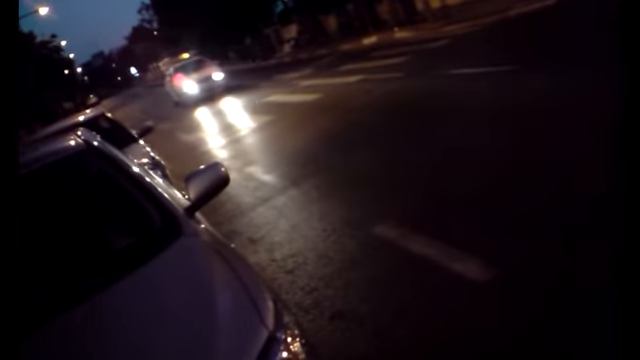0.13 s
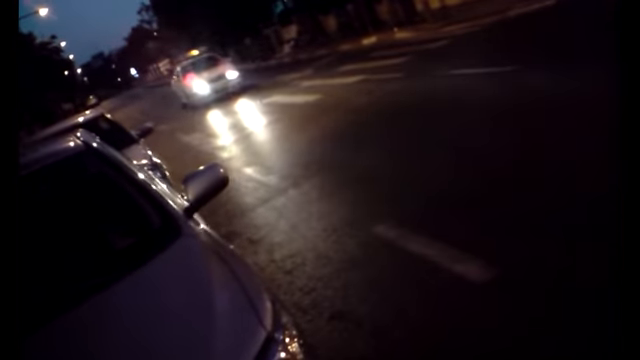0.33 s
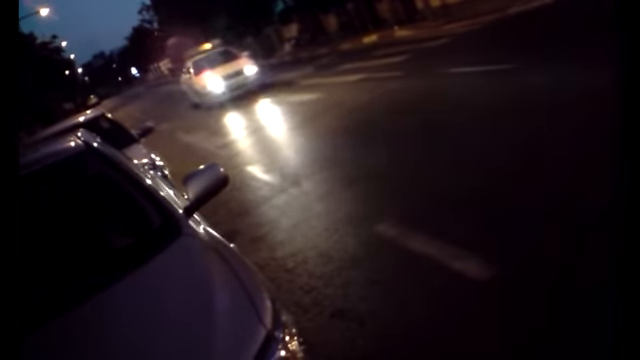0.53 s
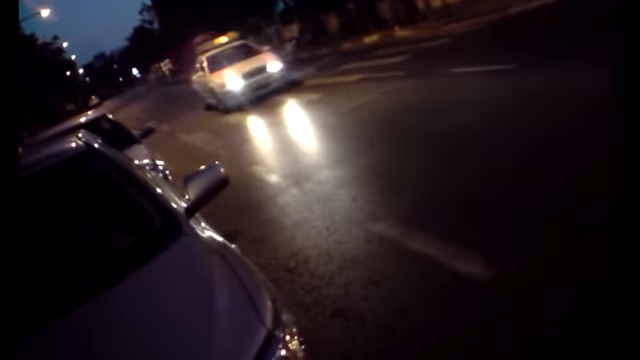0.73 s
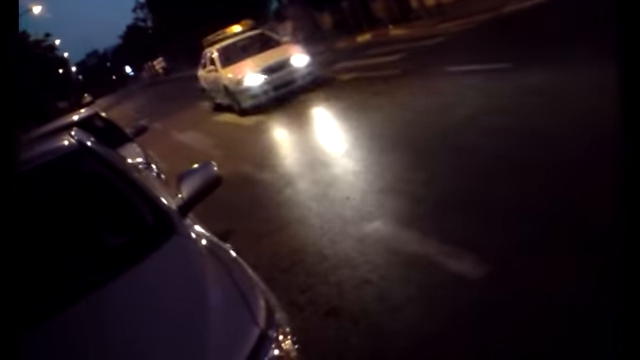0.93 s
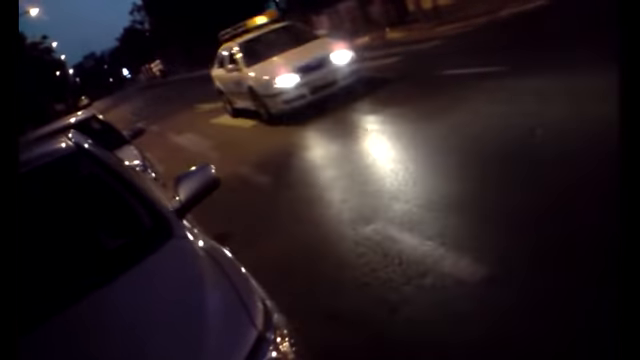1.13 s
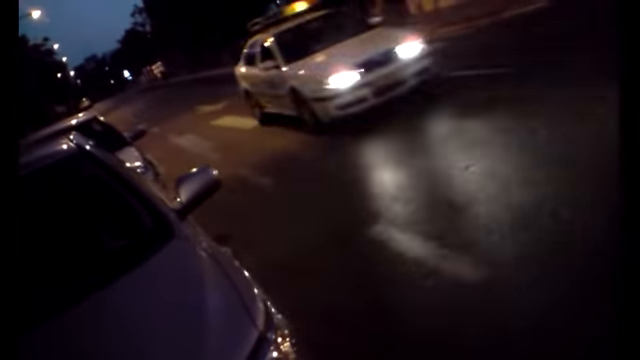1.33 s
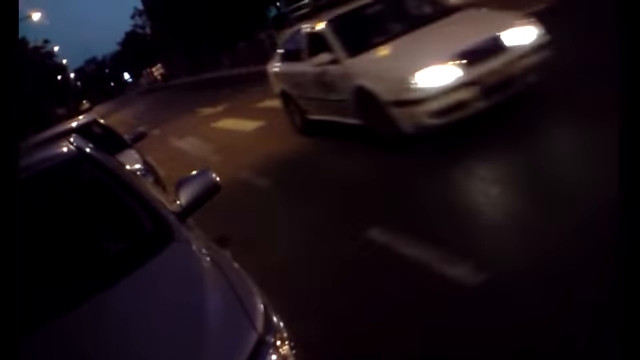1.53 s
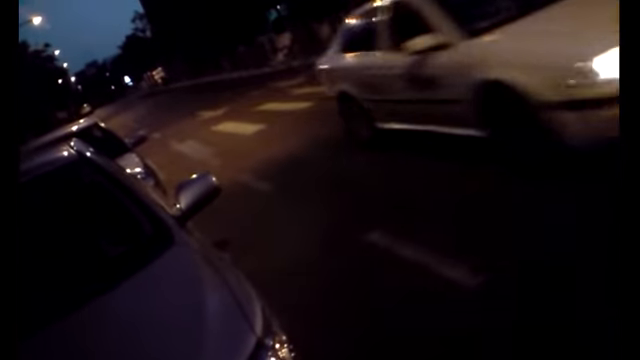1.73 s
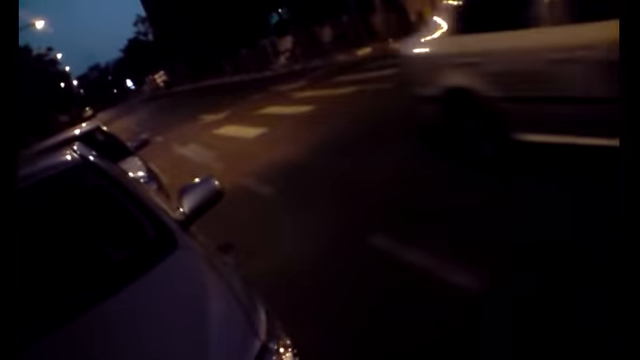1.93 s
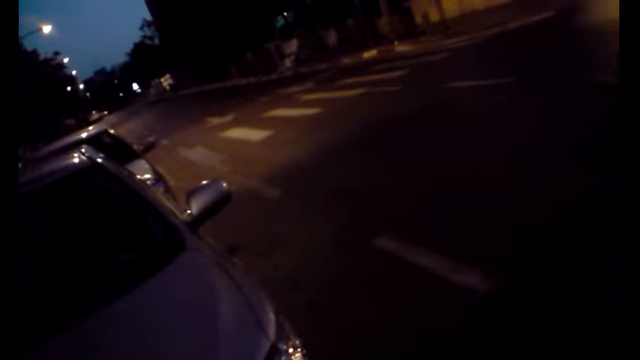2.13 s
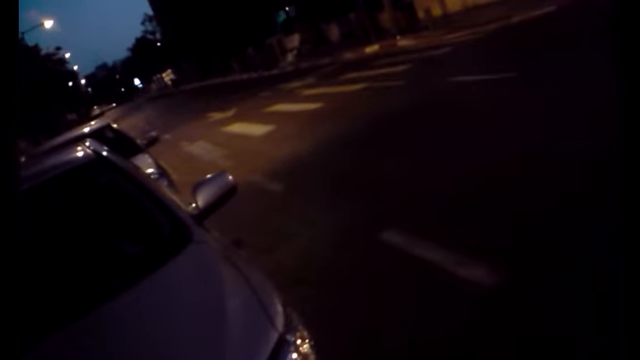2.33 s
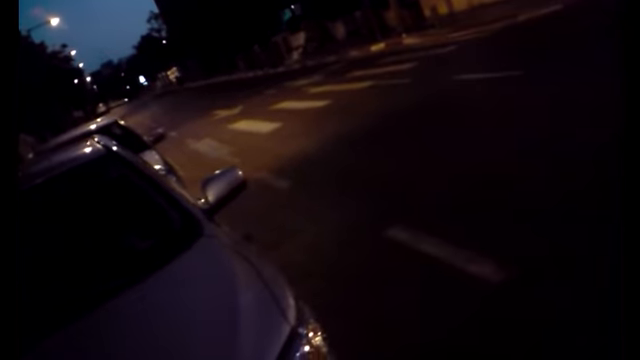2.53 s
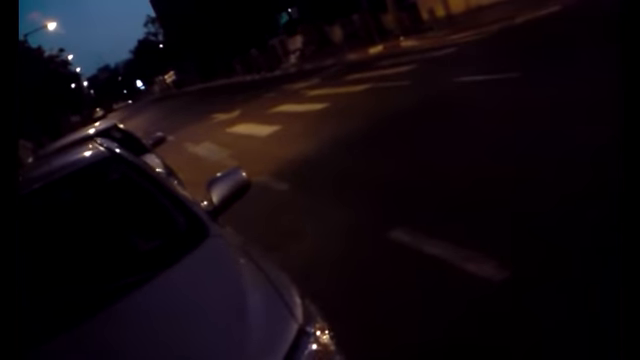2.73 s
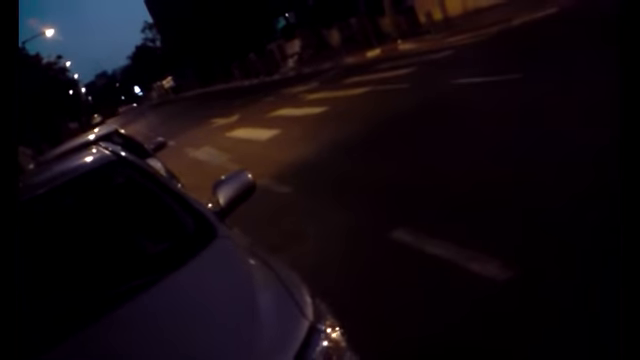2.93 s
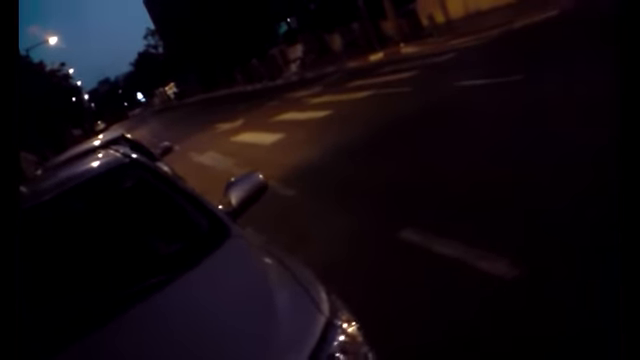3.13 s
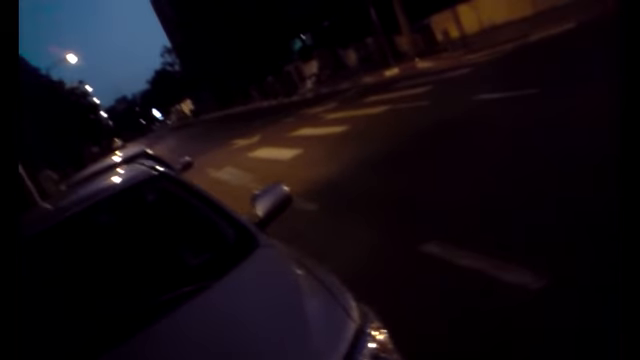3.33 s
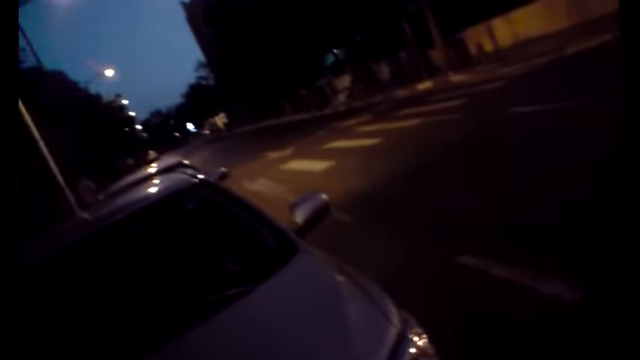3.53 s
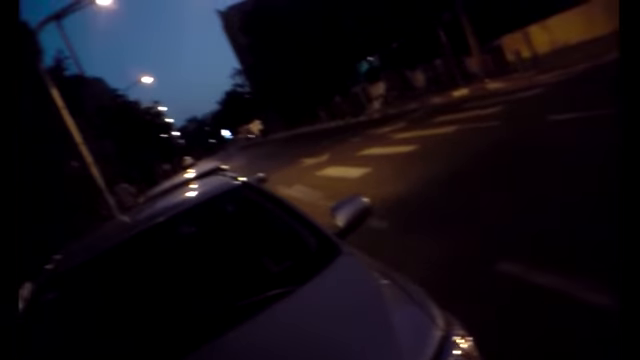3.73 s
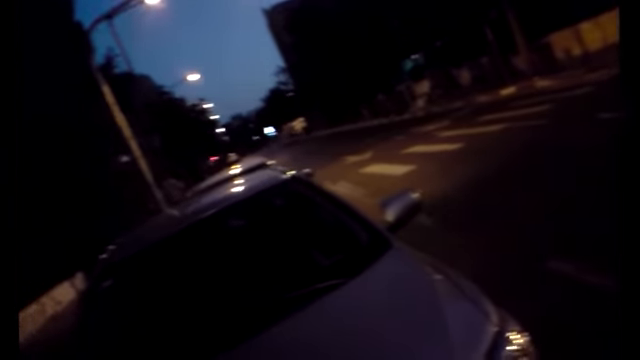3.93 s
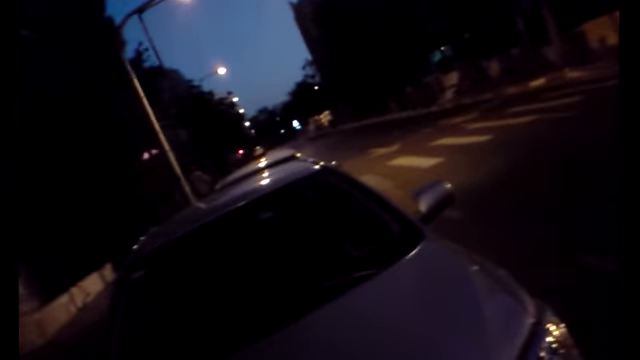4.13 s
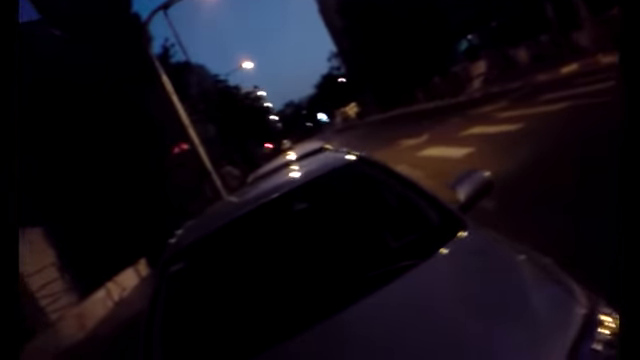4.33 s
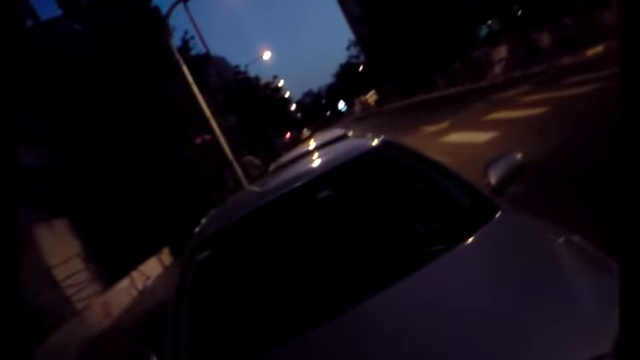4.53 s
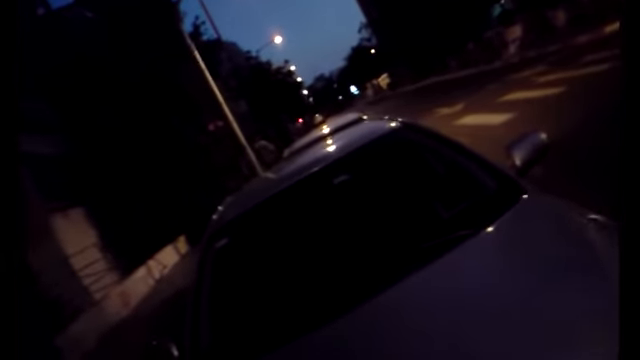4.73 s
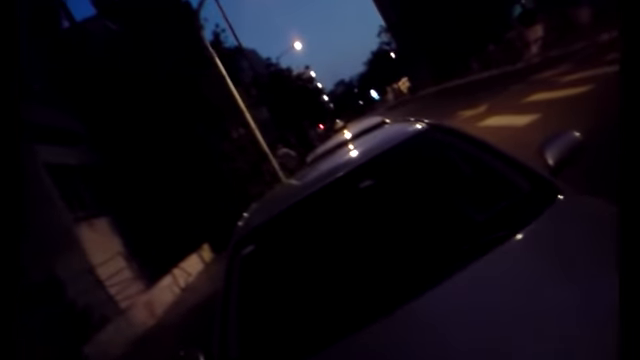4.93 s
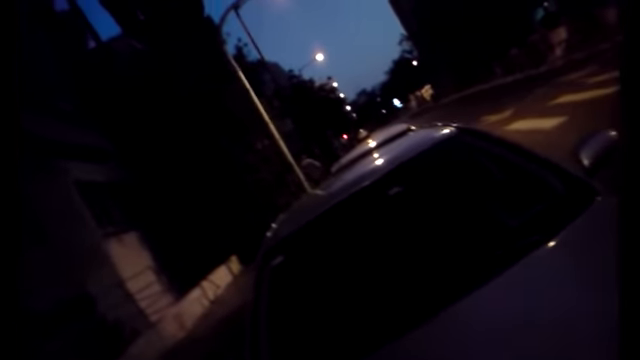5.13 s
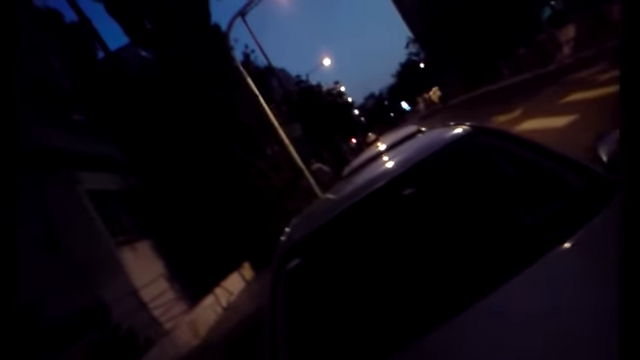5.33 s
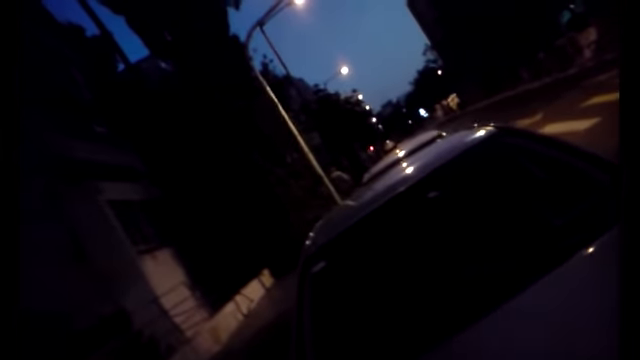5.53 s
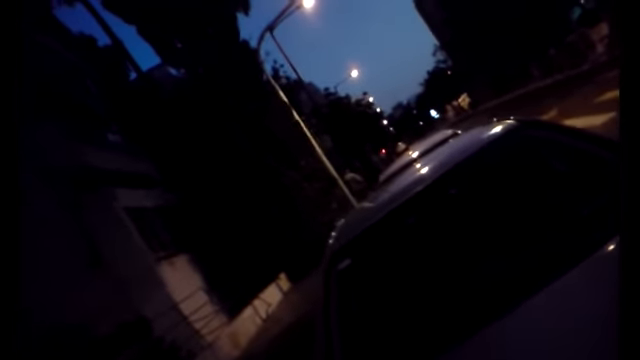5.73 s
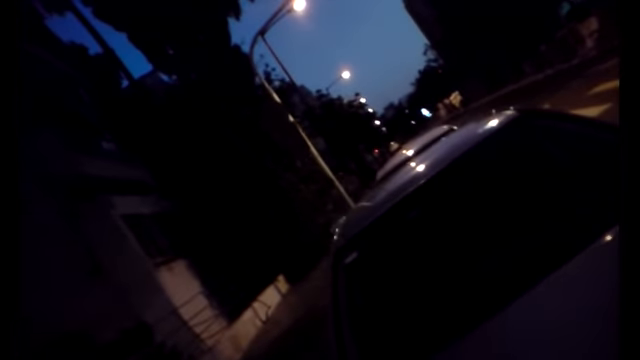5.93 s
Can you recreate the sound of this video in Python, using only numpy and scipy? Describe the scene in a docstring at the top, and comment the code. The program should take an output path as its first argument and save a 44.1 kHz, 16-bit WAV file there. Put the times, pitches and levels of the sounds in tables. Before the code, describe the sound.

Tyres roar and spray on wet asphalt as a car passes close and recedes, leaving faint traffic and one short bird call.

```python
"""A taxi coasts past on a wet street at dawn, closest at about two seconds and slowing as it goes.
Its tyres rumble and roar on the asphalt, throw hissing spray and flick up grit and one stone,
while its four-cylinder engine sinks in pitch. In the quiet that follows a bird calls and the
house fronts answer. Far-off traffic and a faint microphone hiss lie under it all."""
import sys
import numpy as np
from scipy import signal
from scipy.fft import rfft, irfft, next_fast_len
from scipy.io import wavfile
from scipy.ndimage import uniform_filter1d, map_coordinates

SR = 44100
rng = np.random.default_rng(int(sys.argv[2]) if len(sys.argv) > 2 else 0)


def master(y):
    """Save y as 16-bit WAV."""
    cut = np.clip(np.atleast_2d(y).T, -1, 1)
    pcm = np.round(cut * 32767)  # scale
    wavfile.write(sys.argv[1], SR, pcm.astype(np.int16))


N = 268260

AXLES_S = (2.18, 2.334)  # the front and the rear wheels go by
SLOWING_S = 3.33  # from here on the lost speed changes the car's levels
CRUISE_HZ, IDLE_HZ = 85.97, 35.37  # the firing rate at the start, and where it would settle
COAST_S, COAST_POWER = 4.85, 1.8  # time scale of the sinking, and how gently it starts
TREAD_PER_FIRING = 10.8  # tread blocks that meet the road for each firing
TOP_HZ = 11100

# Tone curves of the noise layers and the ticks. Each row: frequency in Hz, relative level in dB.
TRAFFIC_EQ = [(30, -22), (60, -19), (110, -12.5), (145, -9), (200, -7), (350, -6.5), (480, -2), (590, 1.5),
              (690, -2.5), (950, 2.5), (1300, -6), (2500, -31), (6000, -60.5)]
HISS_EQ = [(25, -8), (100, 2.5), (400, 1.5), (2000, 7), (5500, 6), (8000, 6), (10000, -0.5), (11000, -17)]
TICK_EQ = [(150, -32), (600, 1), (5000, -1), (8000, -19)]
MIST_EQ = [(3000, -26), (4400, 7), (5500, 1), (7000, 3), (8000, 3), (8700, -29), (11000, -51)]
RUMBLE_EQ = [(25, -23), (45, -20), (90, -20), (170, -7), (250, 0), (320, 3), (420, 1.5), (500, 3), (590, 5),
             (750, 3), (1300, -33), (4000, -63)]
ROAR_EQ = [(150, -42), (400, -13), (600, -4.5), (780, -5), (1000, -4.5), (1250, 1), (1620, 0), (1950, -4.5),
           (2400, -6), (3100, -16), (4600, -27.5), (5500, -31), (11000, -77)]
SPRAY_EQ = [(500, -18.5), (1100, -26), (1650, 7.5), (2000, 4.5), (2400, 7), (2850, 6.5), (3250, 4.5),
            (4500, 3.5), (5000, -1), (5500, -9.5), (7000, -13), (7900, -22), (8700, -47), (11000, -79)]
PUMPING_EQ = [(300, -79), (500, -35), (660, -7), (760, 0.5), (950, 4), (1090, 3.5), (1250, -1.5),
              (1700, -55), (4000, -120)]

# Pass-by envelopes. Each lists: closest level in dB, seconds until the distance has grown by root 2,
# dB lost per doubling of distance, dB gained ahead and lost behind, dB lost per second of slowing.
THROB_PASS = (-53.5, 0.5, 8, 1, 6)
HUM_PASS = (-57.5, 1, 7, 0.5, 3)
DRONE_PASS = (-47, 0.96, 5.5, 8.5, 0.5)
RUMBLE_PASS = (-38.5, 0.39, 4.5, -0.5, 3)
ROAR_PASS = (-25, 0.3931, 4, 2.5, 3.5)
SPRAY_PASS = (-29.5, 0.1485, 4, 6, 0.4)
TREAD_PASS = (-36, 0.28, 8.5, 0.5, -3.5)
PUMPING_PASS = (-31.5, 0.83, 5.5, 2, 3.5)

# Level rides on the engine. Each row: centre in seconds, half-width in seconds, boost or cut in dB.
THROB_SWELLS = [(0.9, 0.35, -5), (2.4, 0.25, 2), (3.3, 0.09, -12), (3.85, 0.12, 4)]
HUM_SWELLS = [(0.3, 0.15, 2.5), (0.8, 0.22, 5.5), (1.4, 0.18, 6.5), (1.8, 0.17, -16), (2.12, .1, 8),
              (2.42, 0.16, 6), (2.68, 0.088, 7), (2.85, 0.07, 8.5), (3.05, 0.08, -4), (3.27, 0.14, 11.5),
              (3.5, 0.091, -8), (4.07, 0.071, 3), (4.8, 0.21, -8)]
WHINE_SWELLS = [(0.5, 0.2, -6), (1.05, 0.3, 3), (1.62, 0.14, 4), (1.92, 0.12, -4)]
# The tyre roar swells and dips as the car goes by, with the same columns.
ROAR_SWELLS = [(1.94, 0.08, 0.5), (2.12, 0.16, -1.4), (2.68, 0.19, 2.5), (3.0, 0.35, -2.5),
               (3.95, 0.18, 1.9), (4.65, 0.78, -1.5)]
# Deeper water throws more spray, with the same columns.
PUDDLE_SWELLS = [(1.48, 0.39, 1.8), (2.42, 0.12, 1.8), (3.8, 0.29, 1.7)]
# Air pumping peaks just before and after the wheels go by, with the same columns.
PUMPING_SWELLS = [(1.95, 0.21, 5.5), (2.38, 0.2, 6.5), (2.88, 0.11, -0.5)]

# The street's reverb. Each row: frequency in Hz, seconds to die by 60 dB.
STREET_DECAY = [(200, .7), (2500, 0.8), (10000, 0.42)]
# The bird's phrase. Each row: start in seconds, length in seconds, first and last pitch in Hz,
# level in dB, roughness as a share of the pitch.
BIRD_NOTES = [(5.531, 0.017, 2750, 2720, -43, 0.006), (5.551, 0.014, 2710, 2700, -50.5, 0.006),
              (5.772, 0.04, 1795, 1820, -48.5, 0.008), (5.775, 0.045, 2630, 2730, -48, .01),
              (5.807, 0.024, 2935, 3020, -42, .018), (5.83, 0.017, 2624, 2450, -35, 0.057),
              (5.845, 0.028, 2496, 2500, -42, 0.016), (5.881, 0.029, 2510, 2490, -42, 0.013),
              (5.85, 0.066, 2170, 2210, -48, 0.06)]
# Hollow tones. Each row: centre in seconds, half-width in seconds, pitch at the centre in Hz, level in dB.
BOOM_TONES = [(1.72, 0.11, 335.4, -40.5), (2.041, 0.11, 461, -42)]
# The stone's hit lists: start in seconds, attack in seconds, level in dB.
STONE_HIT = (2.205, 0.0022, -14)
# The underbody panel. Each row: pitch in Hz, level against the hit in dB, seconds to die by 60 dB.
PANEL_MODES = [(1190, -3, 0.071), (1815, 3.5, 0.056), (2490, -10, 0.07)]
# Grit and drops. Each row: peak in seconds, pitch in Hz, attack in units of 0.76 ms, pre-EQ level in dB.
GRIT_TICKS = [(0.671, 3630, 0.4, -21), (1.287, 1210, 0.93, -14.5), (1.647, 3580, 0.35, -18),
              (2.084, 3520, 0.37, -18), (2.712, 1040, 0.82, -24), (2.7178, 1790, 0.42, -9),
              (2.95, 1400, 0.65, -21), (3.0104, 1100, 0.7, -21), (5.408, 1050, 0.7, -31)]
# Air ringing in the tread. Each row: centre in seconds, half-width in seconds, pitch in Hz,
# glide in Hz per second, bandwidth in Hz, level in dB.
GROOVE_NOTES = [(0.751, 0.3, 1757, 100, 130, -41), (1.76, 0.24, 1461, 520, 190, -28),
                (1.95, 0.13, 969, 399.5, 190, -30.5), (2.28, 0.12, 793, -250, 95, -32),
                (2.472, 0.045, 1087, 0, 260, -26.5), (3.216, 0.09, 575, 0.5, 50, -41),
                (3.76, 0.15, 680, -60.5, 59, -43.5), (4.678, 0.1, 592, 0.5, 50, -48.5)]
# The engine bay's resonances. Each row: centre in Hz, bandwidth in Hz, gain in dB.
BAY_RESONANCES = [(219, 18.5, 0), (339, 20, -8), (409, 37, -1.5), (590.4, 36, 2.5)]


def amp(db):
    """Decibels to gain."""
    return 10 ** (np.asarray(db) / 20)


def unit(x):
    """x at rms 1."""
    return x / np.sqrt(np.mean(x ** 2) + 1e-20)


def clock():
    """The time of every sample in seconds."""
    return np.arange(N) / SR


def along(points, hz):
    """A curve of (Hz, value) points, read on a log frequency axis."""
    knots_hz, values = np.transpose(points)
    return np.interp(np.log(hz + 1), np.log(knots_hz + 1), values)


def wobble(rate):
    """A smooth random curve, rate knots a second."""
    return map_coordinates(rng.standard_normal(int(N * rate / SR) + 4), [clock() * rate])


def filtered(x, response):
    """x through a gain that depends on frequency."""
    size = next_fast_len(N + SR // 2)
    return irfft(rfft(x, size) * response(np.fft.rfftfreq(size, 1 / SR)), size)[:N]


def equalised(x, curve):
    """x through a tone curve."""
    return filtered(x, lambda hz: amp(along(curve, hz)))


def coloured(x, curve, band):
    """x through a tone curve, brought to rms 1 inside a band."""
    shaped = equalised(x, curve)
    return shaped / np.std(filtered(shaped, lambda hz: (hz > band[0]) & (hz < band[1])))


def patchy(depth_db):
    """White noise with brief patches of random gain."""
    spectra = signal.stft(rng.standard_normal(N), nperseg=1024)[2]
    patches = uniform_filter1d(rng.standard_normal(spectra.shape), size=7, axis=0)
    patches = unit(uniform_filter1d(patches, size=9, axis=1))
    return unit(signal.istft(spectra * amp(depth_db * patches), nperseg=1024)[1][:N])


def blurred_note(hz, width_hz):
    """A narrow band of noise around a steady or gliding pitch."""
    phase = 2 * np.pi * np.cumsum(hz * np.ones(N)) / SR
    slow = lambda: unit(filtered(rng.standard_normal(N), lambda f: 1 / (1 + (2 * f / width_hz) ** 4)))
    return slow() * np.cos(phase) + slow() * np.sin(phase)


def droplets(rate, spread_db):
    """Countless tiny splashes of uneven size."""
    hits = rng.random(N) < rate / SR
    return unit(hits * rng.standard_normal(N) * amp(spread_db * rng.standard_normal(N)))


def bell(centre_s, half_s):
    """A bell-shaped fade in and out."""
    return np.exp(-((clock() - centre_s) / half_s) ** 2)


def swells(rows):
    """A fader ride: one smooth boost or dip for each row."""
    return amp(sum(db * bell(s, half_s) for s, half_s, db in rows))


def passing(envelope, when=AXLES_S):
    """Gain of a sound carried by: it falls with distance, is beamed, and shifts as the car slows."""
    closest_db, near_s, doubling_db, ahead_db, slowing_db_per_s = envelope
    t = clock()
    place = (t - np.reshape(when, (-1, 1))) / near_s
    distance = np.hypot(1, place)
    db = closest_db - doubling_db * np.log2(distance) - ahead_db * place / distance
    slowing = amp(-slowing_db_per_s * np.maximum(t - SLOWING_S, 0))
    return np.sqrt(np.mean(amp(db) ** 2, axis=0)) * slowing


def firing_rate():
    """Coasting in gear, the engine sinks from cruising towards idle."""
    return IDLE_HZ + (CRUISE_HZ - IDLE_HZ) * np.exp(-(clock() / COAST_S) ** COAST_POWER)


def microphone_hiss(db):
    """The microphone's own steady noise floor."""
    return amp(db) * unit(equalised(rng.standard_normal(N), HISS_EQ))


def traffic(db):
    """The faint steady rush of other roads, uncovered as the car recedes."""
    return amp(db) * unit(equalised(rng.standard_normal(N), TRAFFIC_EQ))


def street_echo(x):
    """The house fronts' answer, each frequency dying at its own speed."""
    hz, t, spectra = signal.stft(rng.standard_normal(SR), SR, nperseg=256)
    decay = amp(-60 * t / along(STREET_DECAY, hz)[:, None])
    tail = signal.istft(spectra * decay, SR, nperseg=256)[1]
    return signal.fftconvolve(x, tail / np.linalg.norm(tail))[:N]


def bird():
    """A quick warbled phrase of short whistles, some of them hoarse."""
    t, song = clock(), np.zeros(N)
    flutter = wobble(500)
    for s, length, start_hz, end_hz, db, rough in BIRD_NOTES:
        progress = np.clip((t - s) / length, 0, 1)
        hz = (start_hz + (end_hz - start_hz) * progress) * (1 + rough * flutter)
        envelope = np.sqrt(2 * np.abs(np.sin(np.pi * progress)))
        song += amp(db) * envelope * np.sin(2 * np.pi * np.cumsum(hz) / SR)
    return song


def booms():
    """Brief hollow tones as the body goes by, their pitch sinking with the car's speed."""
    t, speed = clock(), firing_rate()
    tone = lambda s, hz: np.sin(2 * np.pi * np.cumsum(hz * speed / np.interp(s, t, speed)) / SR)
    return sum(np.sqrt(2) * amp(db) * bell(s, half_s) * tone(s, hz) for s, half_s, hz, db in BOOM_TONES)


def stone():
    """A flung stone pings off the underbody, and the panel rings briefly at its modes."""
    s, rise_s, db = STONE_HIT
    age = np.maximum(clock() - s, 0)
    ring = sum(amp(db + mode_db - 60 * age / t60) * np.sin(2 * np.pi * hz * age)
               for hz, mode_db, t60 in PANEL_MODES)
    return ring * (1 - np.exp(-(age / rise_s) ** 2))


def ticks():
    """Each speck of grit or slap of water is a click a few cycles long."""
    t, clicks = clock(), np.zeros(N)
    for s, hz, attack, db in GRIT_TICKS:
        age = np.maximum(1 + (t - s) / (attack * 0.00076), 0)  # 1 at the peak
        clicks += amp(db) * age * np.exp(1 - age) * np.cos(2 * np.pi * hz * (t - s))
    return equalised(clicks, TICK_EQ)


def mist(closest_s, passing_s, db):
    """The finest drops sizzle only while the wheels are near."""
    nearness = 1 / (1 + ((clock() - closest_s) / passing_s) ** 2)
    return amp(db) * nearness * unit(equalised(droplets(rate=3600, spread_db=2), MIST_EQ))


def grooves():
    """The tread grooves ring like short pipes, the pitch sliding as they go by."""
    return sum(amp(db) * bell(s, half_s) * blurred_note(hz + glide * (clock() - s), width_hz)
               for s, half_s, hz, glide, width_hz, db in GROOVE_NOTES)


def engine(harmonics=12, whine_harmonic=5):
    """Firing harmonics: the lowest two throb and hum, the rest drone through the bay's resonances."""
    firing_hz = firing_rate()
    phase = 2 * np.pi * np.cumsum(firing_hz * (1 + 0.0031 * wobble(15))) / SR
    harmonic = lambda k: np.sqrt(2) * amp(1.2 * wobble(8.3)) * np.sin(k * phase)
    bay = lambda hz: sum(amp(db) / (1 + (2 * (hz - centre) / width) ** 2)
                         for centre, width, db in BAY_RESONANCES)
    throb = passing(THROB_PASS, when=2.08) * swells(THROB_SWELLS) * harmonic(1)
    hum = passing(HUM_PASS) * swells(HUM_SWELLS) * harmonic(2)
    ride = lambda k: swells(WHINE_SWELLS) if k == whine_harmonic else 1
    drone = sum(ride(k) * bay(k * firing_hz) * harmonic(k) for k in range(3, harmonics + 1))
    return throb + hum + passing(DRONE_PASS, when=AXLES_S[0]) * drone


def tyres():
    """Rubber on wet asphalt: the carcass rumbles, the tread roars, sings and pumps air, water hisses."""
    low_hz, mid_hz, high_hz = (190, 480), (650, 1800), (3000, 5000)
    road = wobble(30)  # uneven asphalt and water depth shake roar and spray together
    rumble = passing(RUMBLE_PASS) * coloured(patchy(depth_db=0), RUMBLE_EQ, low_hz)
    roar_gain = passing(ROAR_PASS) * swells(ROAR_SWELLS) * amp(0.25 * road)
    roar = roar_gain * coloured(patchy(depth_db=0.52), ROAR_EQ, mid_hz)
    water = patchy(depth_db=0.5) + 0.61 * droplets(rate=2500, spread_db=2.5)
    spray_gain = passing(SPRAY_PASS) * swells(PUDDLE_SWELLS) * amp(0.19 * road)
    spray = spray_gain * coloured(water, SPRAY_EQ, high_hz)
    tread = passing(TREAD_PASS) * blurred_note(TREAD_PER_FIRING * firing_rate(), width_hz=124)
    pumping_gain = passing(PUMPING_PASS) * swells(PUMPING_SWELLS)
    pumping = pumping_gain * coloured(patchy(depth_db=1.4), PUMPING_EQ, mid_hz)
    return rumble + roar + pumping + spray + tread


def scene():
    """The mono mix: the car up front, the bird in its echo, a bed of traffic and hiss."""
    song = bird()
    hiss = microphone_hiss(db=-54.5)
    sizzle = mist(closest_s=2.0, passing_s=0.26, db=-43)
    car = tyres() + grooves() + sizzle + ticks() + stone() + engine() + booms()
    return (car + song + amp(-5.5) * street_echo(song) + traffic(db=-49.5) + hiss)[None]


def record(dry):
    """The camera's band limit: a brick-wall low-pass on the whole mix."""
    return filtered(dry[0], lambda hz: hz < TOP_HZ)[None]


dry = scene()
out = record(dry)
master(out)
```